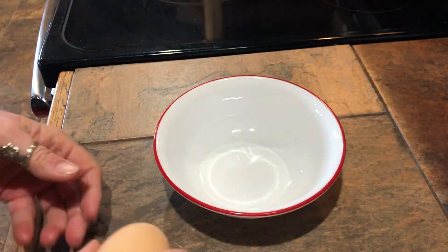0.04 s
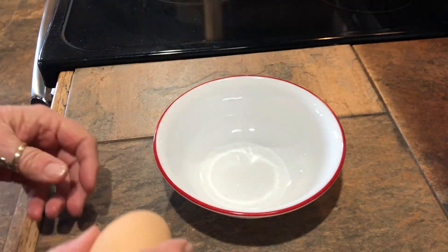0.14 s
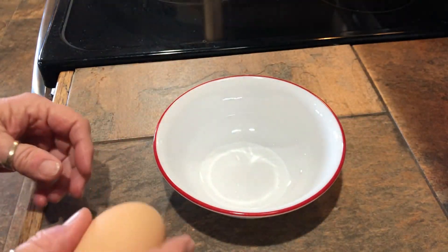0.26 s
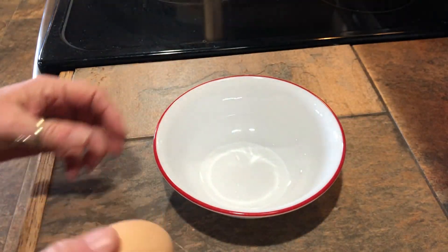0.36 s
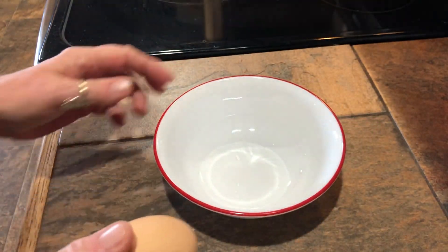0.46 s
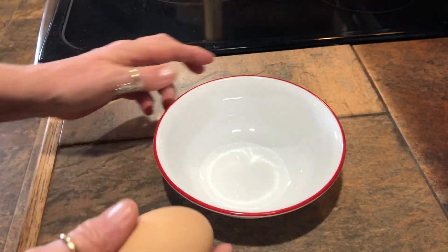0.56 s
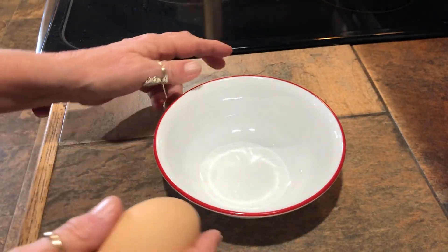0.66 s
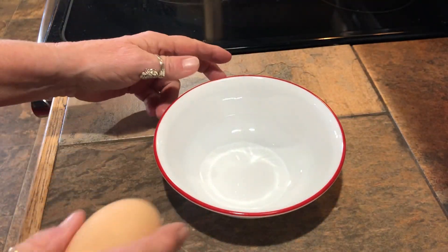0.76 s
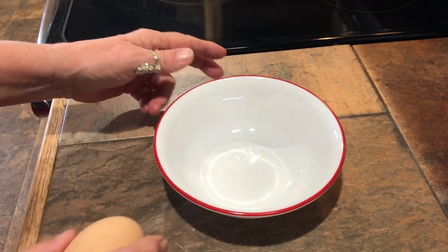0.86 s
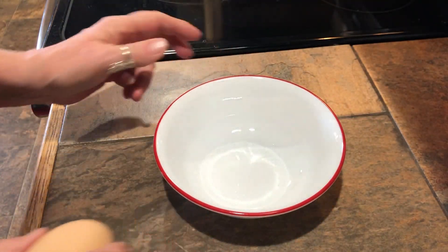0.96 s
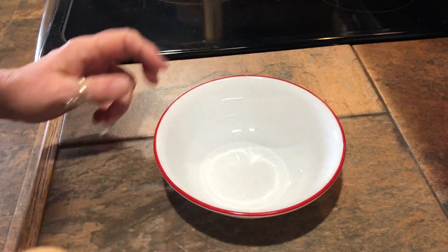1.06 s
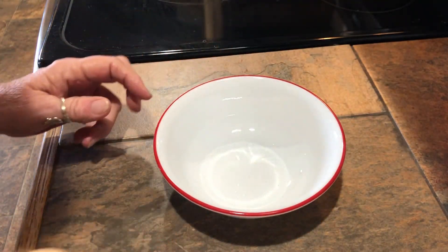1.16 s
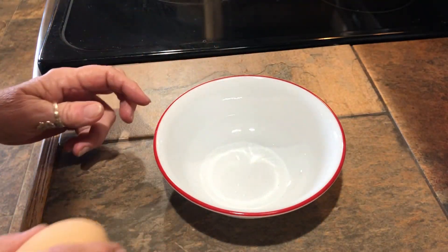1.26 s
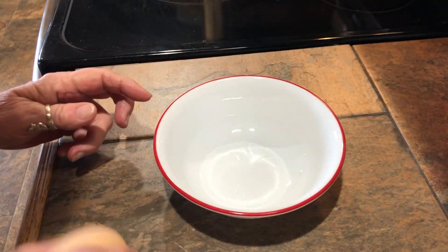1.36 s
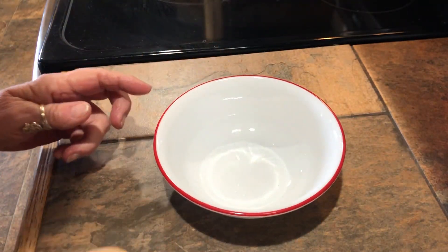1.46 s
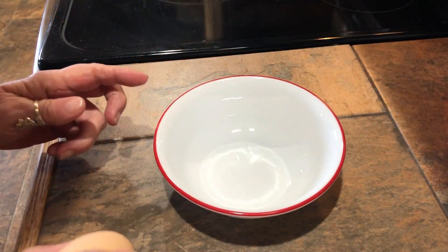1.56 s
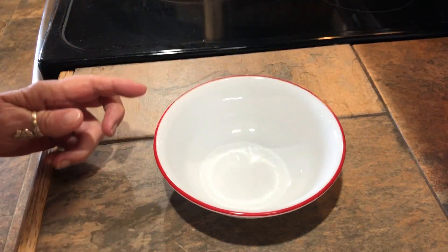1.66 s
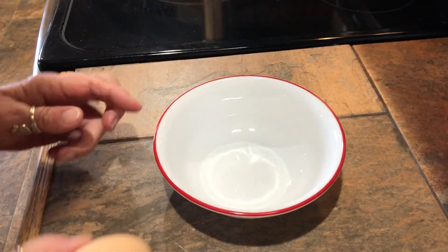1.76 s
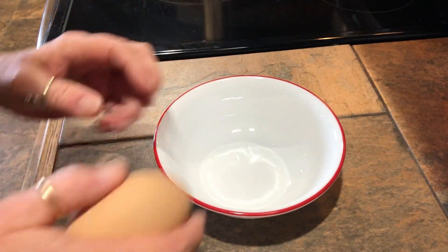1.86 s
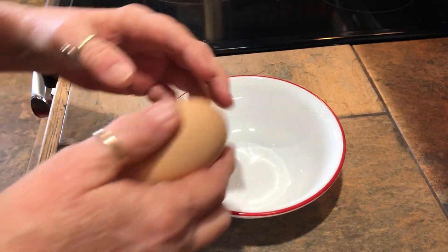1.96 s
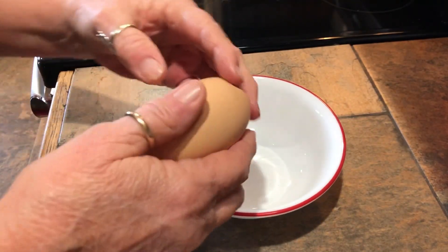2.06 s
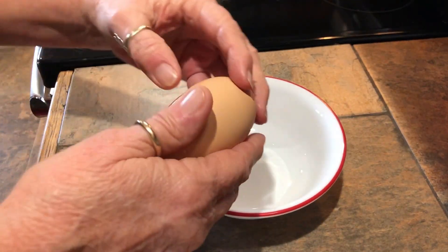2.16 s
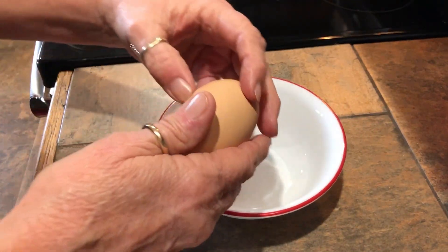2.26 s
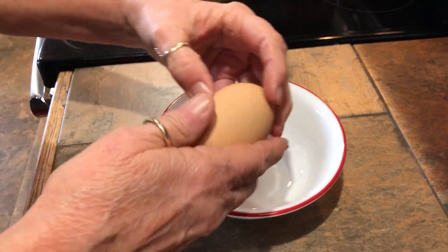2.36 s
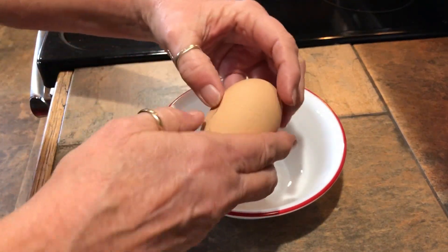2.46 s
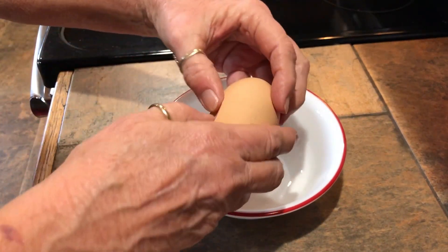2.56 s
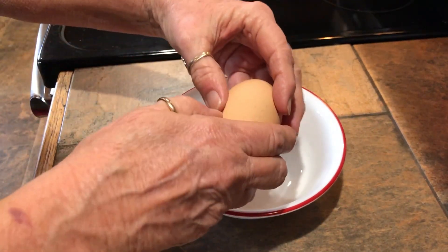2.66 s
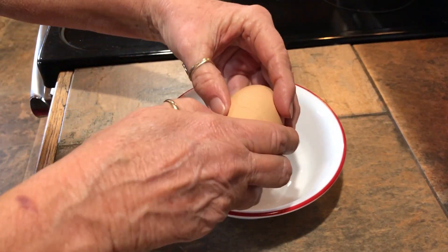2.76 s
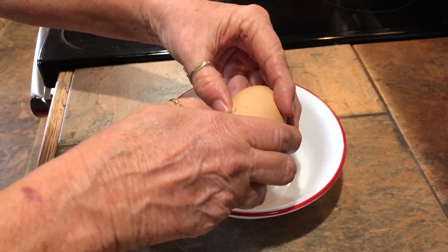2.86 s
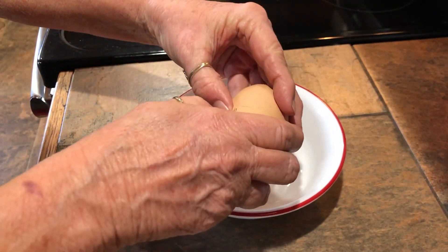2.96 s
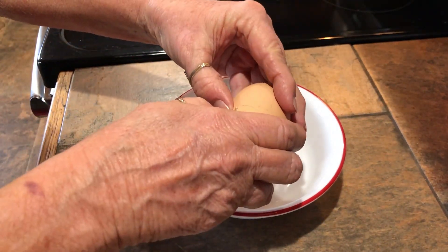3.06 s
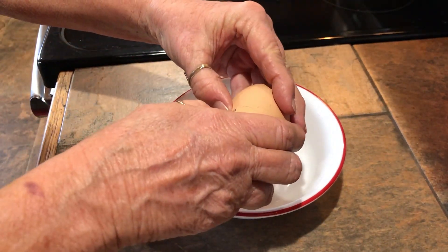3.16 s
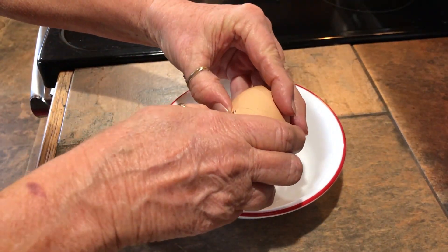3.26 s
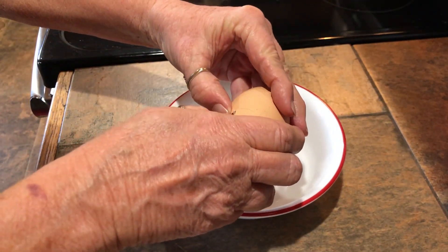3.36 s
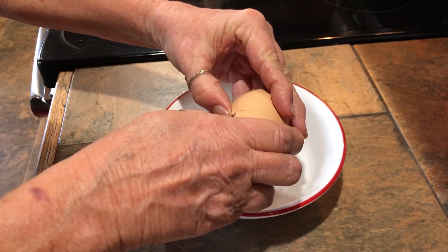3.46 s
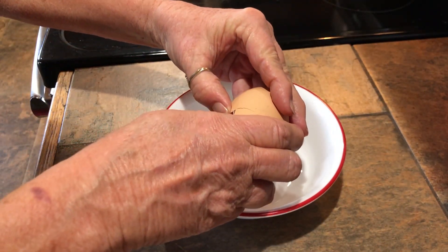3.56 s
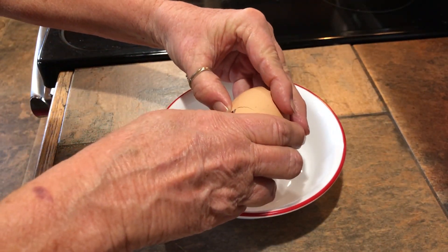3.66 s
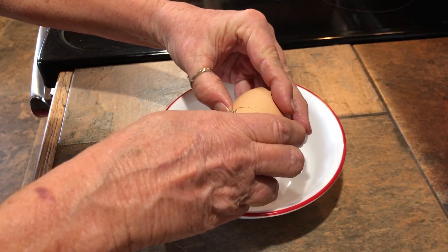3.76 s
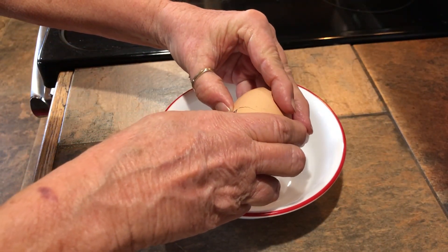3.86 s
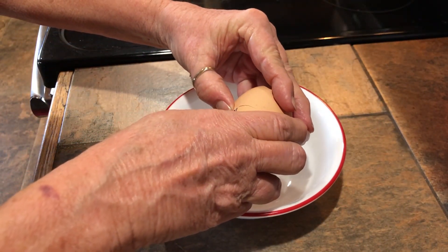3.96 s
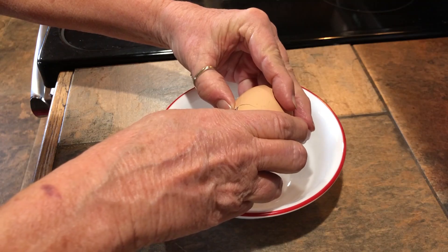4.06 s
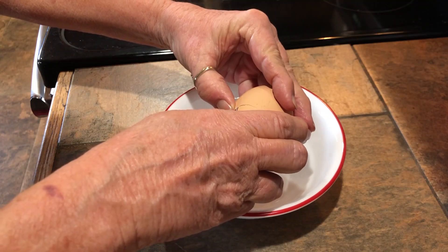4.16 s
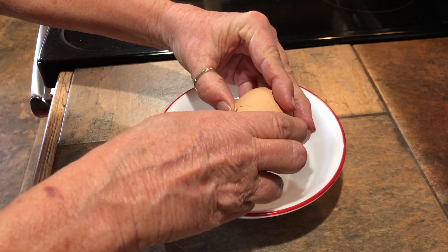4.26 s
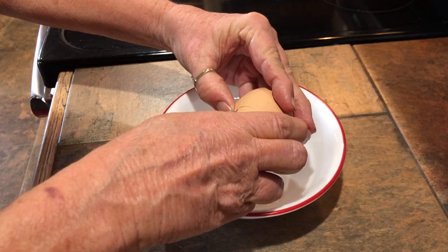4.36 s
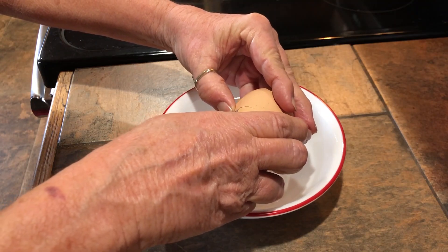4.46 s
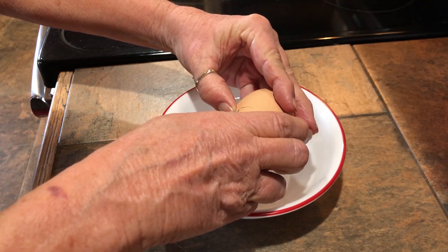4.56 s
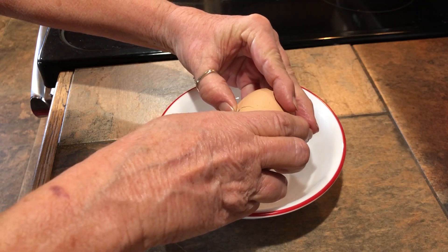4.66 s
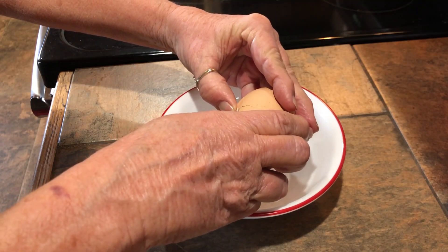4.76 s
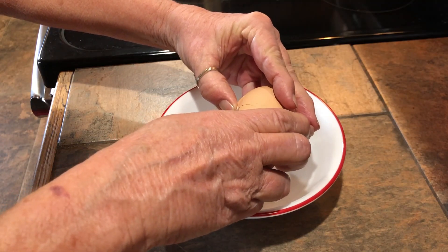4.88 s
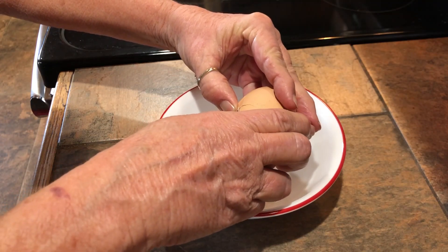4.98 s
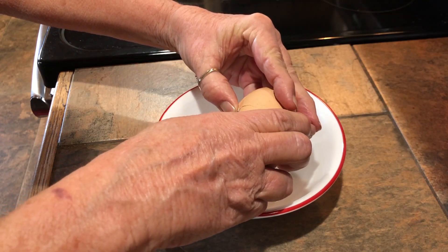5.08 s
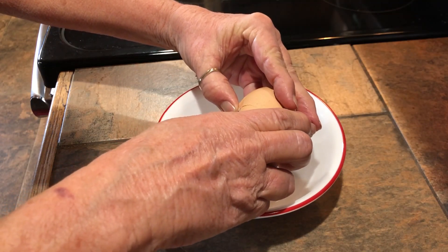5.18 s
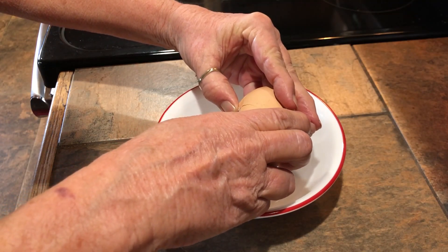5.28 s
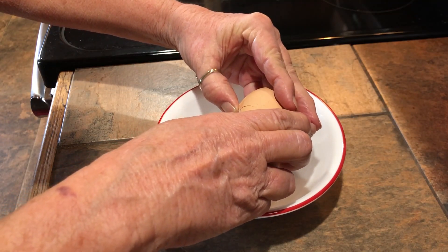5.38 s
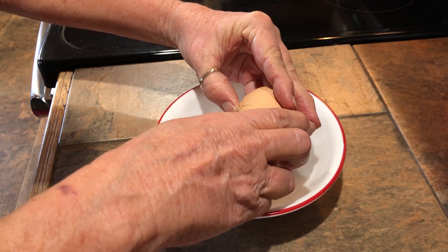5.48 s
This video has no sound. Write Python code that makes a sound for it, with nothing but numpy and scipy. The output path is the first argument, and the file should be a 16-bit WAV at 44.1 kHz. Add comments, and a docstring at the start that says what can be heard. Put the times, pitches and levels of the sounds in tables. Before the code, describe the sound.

In a quiet kitchen, heard from close by, an eggshell caves in against a hard counter with a loud double knock that rings briefly in the room. A short pause follows. Then the shell is slowly pulled open, ticking and crackling in small uneven clusters, with soft bumps and a faint rub of fingers. The brittle snaps grow stronger toward the end, over a very low room hum.

```python
"""An eggshell fractures: knocked twice on a tiled kitchen counter, then pried apart by thumbs over a bowl.
Each knock excites the modes of the counter and the cabinet below. Each crack is an impulse that rings
the shell and the opening hollow inside it, and runs of tiny fractures merge into crumbling. Skin rubs
softly on the shell, dull contacts sound near and far, and the kitchen hums and reverberates."""
import sys
import numpy as np
from scipy import signal
from scipy.fft import rfft, irfft, next_fast_len
from scipy.io import wavfile
from scipy.ndimage import uniform_filter1d

SR = 44100
rng = np.random.default_rng(int(sys.argv[2]) if len(sys.argv) > 2 else 0)


def to_wav(sig):
    """Store sig (one row per channel, or 1-D mono) as 16-bit WAV at the path in sys.argv[1].

    Samples outside -1..1 are clipped; the rate is SR.
    """
    pcm = np.clip(np.atleast_2d(sig), -1, 1) * 32767
    pcm = np.round(pcm).astype(np.int16)
    wavfile.write(sys.argv[1], SR, pcm.T)  # frames by channels


N = 243431


def amp(db):
    """Amplitude ratio of a level in decibels."""
    return 10 ** (np.asarray(db) / 20)


def unit(x):
    """Normalisation to an rms of 1."""
    return x / np.sqrt(np.mean(x ** 2, axis=-1, keepdims=True) + 1e-20)


def along(points, hz):
    """Interpolation of (frequency, value) points on a logarithmic frequency axis."""
    f, v = np.transpose(points)
    return np.interp(np.log(hz + 1), np.log(f + 1), v)


def filtered(x, response):
    """Linear filtering: the spectrum is multiplied by a frequency response."""
    n = x.shape[-1]
    m = next_fast_len(n + 8192)
    return irfft(rfft(x, m) * response(np.fft.rfftfreq(m, 1 / SR)), m)[..., :n]


def noise(shape, response):
    """Spectral shaping of white noise, at an rms of 1."""
    return unit(filtered(rng.standard_normal(shape), response))


def flicker(n, spread_db, samples):
    """Random amplitude modulation: a log-normal gain, smoothed over a span of samples."""
    return amp(spread_db * unit(uniform_filter1d(rng.standard_normal(n), size=samples)))


def resonance(hz, centre_hz, width_hz):
    """Band-pass response of a damped harmonic oscillator."""
    return 1j * hz * width_hz / (centre_hz ** 2 - hz ** 2 + 1j * hz * width_hz + 1e-9)


def modes(table):
    """Modal superposition: a body's resonances add, here with alternating signs."""
    return lambda hz: sum((-1) ** k * amp(db) * resonance(hz, centre, width)
                          for k, (centre, width, db) in enumerate(table))


def fade(t, rise, t60):
    """Exponential decay, 60 dB in t60 seconds, after a smooth rise."""
    return (1 - np.exp(-t / rise)) * amp(-60 * t / t60)


def spells(rows, rise, t60, rest_db=-120):
    """Power summation of (start, end, level) spells that rise, hold and decay, over a resting level."""
    t = np.arange(N) / SR
    power = 0
    for start, end, db in rows:
        onset = np.clip((t - start) / rise + .5, 0, 1)
        power += (onset * amp(db - 60 * np.clip(t - end, 0, None) / t60)) ** 2
    return np.sqrt(power + amp(rest_db) ** 2)


def add(track, start, sound):
    """Superposition of a sound on a track, from a start time in seconds."""
    i = round(start * SR)
    track[i:i + len(sound)] += sound[:len(track) - i]


# Spectrum of the quiet kitchen: (frequency [Hz], relative density [dB])
HUM_SPECTRUM = [(15, -49), (25, -6), (135, -4), (296, -6), (524, -10.5), (809, -13), (979, -15.5),
                (1150, -16.5), (2090, -18), (3150, -20), (12900, -27.5), (15200, -28.5), (16500, -46.5)]
# Swells of the low rumble: (start [s], end [s], level [dB])
RUMBLE_SWELLS = [(0, .05, -69.5), (.38, .52, -66), (2.9, 3.1, -69), (3.55, 3.8, -70)]

def hum():
    """Ambient noise: a steady broadband floor and a low rumble that swells now and then."""
    colour = lambda hz: amp(along(HUM_SPECTRUM, hz))
    steady = amp(-70.5) * noise(N, colour)
    rumble = noise(N, lambda hz: colour(hz) * resonance(hz, 92, 620))
    return steady + spells(RUMBLE_SWELLS, rise=0.081, t60=1.5, rest_db=-72.5) * rumble


# Spectrum of skin sliding on shell: (frequency [Hz], relative density [dB])
SKIN_SPECTRUM = [(1500, -45.5), (2500, -5), (3600, -3), (5400, 1.5), (8000, 0.5), (12000, -1), (15500, 1.5),
                 (16500, -23.5)]
# Finger strokes: (start [s], end [s], level [dB])
FINGER_STROKES = [(0, .12, -72), (.55, .66, -68.5), (.87, .9, -82), (1.0, 1.03, -75.5), (1.07, 1.12, -76),
                  (1.96, 2.08, -68), (2.12, 2.36, -74), (2.42, 2.49, -64), (2.54, 2.72, -71),
                  (3.5, 3.62, -76), (4.045, 4.07, -66), (4.8, 5.2, -69.5)]
# Resonances of a singing scrape: (frequency [Hz], bandwidth [Hz], gain [dB])
SCRAPE_MODES = [(3600, 220, -2.5), (5400, 200, -1)]
# Faint scrapes: (start [s], end [s], level [dB])
SCRAPE_SPELLS = [(.54, .645, -71), (2.67, 2.725, -73)]
# Narrow-band murmurs: (start [s], end [s], level [dB], centre frequency [Hz])
MURMUR_SPELLS = [(1.373, 1.482, -74, 1940), (4.272, 4.558, -71, 1650), (4.61, 4.884, -73, 1500),
                 (4.9, 5.11, -65, 1400)]

def rubbing():
    """Sliding friction: skin on shell gives grainy noise and resonant scrapes; a murmur comes and goes."""
    grain = flicker(N, spread_db=1.0, samples=90)
    stutter = flicker(N, spread_db=1.5, samples=1800)  # fingers stop and start
    skin = unit(stutter * grain * noise(N, lambda hz: amp(along(SKIN_SPECTRUM, hz))))
    murmur = np.zeros(N)
    for *spell, centre_hz in MURMUR_SPELLS:
        band = noise(N, lambda hz: resonance(hz, centre_hz, width_hz=600) ** 2)
        murmur += spells([spell], rise=0.06, t60=0.5) * stutter * band
    scrape = unit(grain * noise(N, modes(SCRAPE_MODES)))
    strokes = spells(FINGER_STROKES, rise=0.037, t60=0.21, rest_db=-81.5)  # the grip never falls silent
    return strokes * skin + spells(SCRAPE_SPELLS, rise=.015, t60=.04) * scrape + murmur


# Modes of the held shell: (frequency [Hz], bandwidth [Hz], gain [dB])
SHELL_MODES = [(5140, 520, 1.5), (5980, 460, -3.5), (6400, 530, -2)]
# The hollow rings longer once the gap opens; two rows: (time [s]), (bandwidth [Hz])
HOLLOW_OPENING = [4.3, 4.45], [240, 125]
# Distinct cracks: (time [s], relative level [dB], dull gain [dB], bright gain [dB], hollow gain [dB],
# hollow frequency [Hz])
SHELL_CRACKS = [(0.2946, -61.5, -9, 19.5, -9, 750), (0.4774, -61.5, 19, -14, -20, 810),
                (2.0029, -50.5, 2, 4, -6, 1697), (2.5224, -64, 8, -13, 4.5, 764),
                (2.7611, -50.5, -8, -6, -17.5, 846), (2.7848, -52.5, -11, 11, -7, 1350),
                (2.7916, -35, -2.5, 5, -18, 1450), (2.8058, -36.5, -22, 8, -35, 1306),
                (2.824, -39, -13, 1, -33, 842), (2.839, -48, -11, -8, -5.5, 1720),
                (2.8775, -44.5, -2, -11, -17.5, 1340), (2.9773, -24, -12, -7, -43, 1550),
                (2.9915, -28, -32, -16.5, -44, 1497), (3.0167, -32.5, -12, 1, -24, 1650),
                (3.0279, -25.5, -1.5, 1, -35, 1700), (3.057, -45, -4, -10, -17, 751),
                (3.1143, -33, -2, 0, -25, 1360), (3.2262, -51, 3, 12, -18, 1345),
                (3.2844, -56, -10, 13, -22, 816), (3.2942, -41.5, -20, -3, -38, 1754),
                (3.335, -43, -1, -11.5, -29, 1780), (3.3504, -39, -6, 1, -34, 1730),
                (3.3625, -45, -5, 4, -14, 1360), (3.3957, -53, -2, -5, -17, 1350),
                (3.414, -53, 8, -1, -15, 799), (3.496, -53.5, -6, 1.5, -21, 942),
                (3.5586, -43, -3, 5, -34, 920), (3.5704, -55, -12, 15, -14, 793),
                (3.5825, -38, -14, -6, -30, 996), (3.5992, -38.5, -4, 3, -35, 870),
                (3.6306, -47, -7, -13, -16, 890), (3.6568, -27, -5.5, -2.5, -30, 1720),
                (3.7481, -41.5, -13, -18, -18, 1400), (3.8307, -53, -3.5, 0, -27, 834),
                (3.863, -51.5, 1, -4, -24, 783), (3.8911, -51, 7.5, 9.5, -7, 1700),
                (3.9199, -52.5, -3, -22, -17, 886), (3.9637, -27.5, -8, -1.5, -32, 880),
                (4.0251, -41, -0.5, -8, -41, 758), (4.0672, -45.5, -2, 4, -9, 1570),
                (4.107, -50.5, -8.5, -5, -10, 1730), (4.163, -49, -18, 2, -25, 885),
                (4.1929, -41, -2, -26, -28, 1488), (4.3648, -37.5, 0, -23, -11.5, 1443),
                (4.4585, -47.5, -2, 4.5, -8, 840), (4.473, -50, -1, -9, -5, 1640),
                (4.5234, -54.5, -8, -3, -20, 1600), (4.575, -51, -14, -6, -5, 1350),
                (4.586, -35.5, 0, -1, -19, 880), (4.621, -46.5, 0, 1, 3.5, 906),
                (4.6506, -56.5, 18, -13, 5, 1320), (4.6743, -48.5, -18, 15.5, -10, 1290),
                (4.7246, -36.5, -24, -16, -3, 1710), (4.7326, -13.5, -13.5, -8, -23.5, 1055),
                (4.777, -58.5, 8, 8, 9.5, 1350), (4.8129, -24.5, -0.5, 0, -16.5, 1380),
                (4.8399, -39, 8, 17, -6.5, 1710), (4.8476, -36.5, -2, -2, -16, 1580),
                (4.8631, -44.5, 8.5, -20, -2, 1280), (4.9023, -21.5, -7, 11, -14.5, 1470),
                (4.915, -21.5, -17, -5, -25, 870), (4.9543, -7.5, -10, -0.5, -21.5, 1353),
                (5.0292, -41.5, 5.5, 4, -4.5, 1350), (5.0647, -34, -21, 2.5, -12.5, 1390),
                (5.0903, -39.5, -7, 5, -37, 1467), (5.1009, -31.5, -3, 2.5, -11, 1520),
                (5.1999, -43.5, -2, 9.5, -10, 1510), (5.2362, -16.5, -29, -1.5, -38, 1530),
                (5.2774, -44, 1, -6, -10, 1028), (5.303, -33.5, -5, 8, -18, 1650),
                (5.446, -23.5, -20.5, 3.5, -20.5, 1680), (5.475, -36.5, -10, -3, -21, 1630),
                (5.4845, -45.5, -12, 14, -2.5, 1000), (5.4973, -27.5, -10, 8, -25, 1600),
                (5.5052, -37, -13, -5, -12, 1000)]

def cracks():
    """Brittle fracture: a tick and a noise burst excite the egg's cavity. Returns (all, ticks alone)."""
    out, ticks, t = np.zeros(N), np.zeros(N), np.arange(SR // 16) / SR
    detune = np.exp(.045 * rng.standard_normal((len(SHELL_CRACKS), 1)))  # each crack shifts the modes
    bands = [lambda hz: modes(SHELL_MODES)(hz / detune),
             lambda hz: resonance(hz, 3200, 3530) ** 2,  # dull
             lambda hz: resonance(hz, 8100, 9600) ** 2 * resonance(hz, 12000, 20000),  # bright
             lambda hz: resonance(hz, 1430, 2430) ** 2]  # broad puff of air from the hollow
    hiss = np.array([noise((len(SHELL_CRACKS), len(t)), band) for band in bands])
    impulses = np.ones(detune.shape) * (t == t[8])
    tick = np.array([filtered(impulses, band) for band in bands])
    tick /= np.abs(tick).max(axis=2, keepdims=True)
    flutter = amp(-13.5) * fade(t, 0.00034, 0.084) / (1 + (t / 0.014) ** 4)  # off hands and bowl
    snap = fade(t, 0.00045, 0.0086) + flutter
    for k, (start, db, dull_db, bright_db, hollow_db, hollow_hz) in enumerate(SHELL_CRACKS):
        mix = amp([db, db + dull_db, db + bright_db, db + hollow_db + 7])
        burst = amp(-8.5) * snap * (mix @ hiss[:, k])
        width_hz = np.interp(start, *HOLLOW_OPENING)
        air = filtered(snap * hiss[-1, k], lambda hz: resonance(hz, hollow_hz, width_hz))
        add(out, start, burst + amp(db + hollow_db) * air / np.abs(air).max())
        add(ticks, start, mix @ tick[:, k])
    return out + amp(-3.5) * ticks, ticks


# Decay of the kitchen: (frequency [Hz], reverberation time T60 [s])
KITCHEN_T60 = [(100, .4), (600, 0.13), (1500, 0.59), (4000, 0.42), (9000, 0.34), (15000, 0.11)]

def reverberation(x):
    """Diffuse reflection: hands and egg keep moving, so each stretch meets its own decaying noise tail."""
    out, step, delay_s = np.zeros(N), SR // 5, 0.0082
    for i in range(0, N, step):
        hz, t, spectra = signal.stft(rng.standard_normal(SR // 2), SR, nperseg=256)
        decay = amp(-60 * t / along(KITCHEN_T60, hz)[:, None])
        tail = signal.istft(spectra * decay, SR, nperseg=256)[1]
        add(out, i / SR + delay_s, signal.fftconvolve(x[i:i + step], tail / np.linalg.norm(tail)))
    return out


# Soft contacts: (time [s], level [dB], centre frequency [Hz], T60 [s], room excitation [dB])
SOFT_BUMPS = [(0.3147, -41, 1000, 0.068, -64), (0.441, -48.5, 854, 0.046, -73.5),
              (0.48, -52.5, 302, 0.052, -74.5), (1.179, -62.5, 1120, 0.053, -84),
              (1.363, -70, 4595, 0.04, -99), (2.792, -49.5, 410, 0.042, -78),
              (2.978, -57, 600, 0.016, -80.5), (3.029, -55, 590, 0.032, -80), (3.113, -51, 500, 0.029, -99),
              (3.518, -58, 776, 0.21, -91), (3.528, -53, 300, 0.14, -94), (3.57, -43.5, 590, 0.069, -94),
              (3.597, -53.5, 503, 0.092, -94), (3.66, -46.5, 500, 0.019, -100),
              (4.036, -53.5, 840, 0.084, -73), (4.04, -51, 2230, 0.061, -75), (4.061, -57, 2740, 0.08, -82),
              (4.2366, -42.5, 1510, 0.03, -98), (4.242, -41.5, 250, 0.019, -82),
              (4.7307, -42.5, 590, 0.028, -70)]

def bumps():
    """Damped impacts: dull puffs, the distant ones mostly reverberant. Returns (direct, room drive)."""
    direct, drive, t = np.zeros(N), np.zeros(N), np.arange(SR // 5) / SR
    impulse = 1. * (t == 0)
    for start, db, centre_hz, t60, room_db in SOFT_BUMPS:
        puff = noise(len(t), lambda hz: resonance(hz, centre_hz, 0.64 * centre_hz) ** 2)
        add(direct, start, amp(db) * fade(t, 0.00031, t60) * puff)
        colour = lambda hz: resonance(hz, 0.73 * centre_hz, 1.7 * centre_hz) * resonance(hz, 1500, 6000)
        add(drive, start, amp(room_db) * unit(filtered(impulse, colour)))
    return direct, drive


# Spectrum of the shell caving in: (frequency [Hz], relative density [dB])
SMASH_SPECTRUM = [(88, -44.5), (150, -17), (1180, -10.5), (1900, -13), (2980, -5.5), (3700, -9.5),
                  (4160, -5), (7080, -8.5), (7660, -11), (11000, -9.5), (15300, -17.5), (16500, -37)]
# Modes of the tiled counter: (frequency [Hz], bandwidth [Hz], gain [dB])
COUNTER_MODES = [(340, 120, -12), (503, 30, -2), (788, 85, -1.5), (1000, 52, -2), (1210, 40, 0.5),
                 (1350, 54, -3.5), (1600, 92, -4), (1906, 100, -15)]
# Modes of the cabinet below: (frequency [Hz], bandwidth [Hz], gain [dB])
CABINET_MODES = [(65, 90, -11.5), (116, 32, 0), (138, 40, -4), (213, 25, -8)]
# Blows on the counter: (time [s], level [dB], counter gain [dB], cabinet gain [dB], burst rise [s],
# burst T60 [s], splinter gain [dB], pop gain [dB], pop frequency [Hz])
EGG_KNOCKS = [(1.4823, -2, -12, -21.5, .0006, .03, -29, -5, 1213),
              (1.7026, -3, -17.5, -26, 0.0024, 0.029, -23.5, -14.5, 337)]

def knocks():
    """Impact excitation: the shell caves in, counter and cabinet ring. Returns (direct, room drive)."""
    direct, impulses, t = np.zeros(N), np.zeros(N), np.arange(SR // 2) / SR
    colour = lambda hz: amp(along(SMASH_SPECTRUM, hz))
    for start, db, ring_db, thump_db, rise, t60, splinter_db, pop_db, pop_hz in EGG_KNOCKS:
        grit = flicker(len(t), spread_db=3.3, samples=20)  # many fractures in a row
        envelope = fade(t, rise, t60) + amp(splinter_db) * fade(t, 0.0015, 0.041)
        burst = unit(grit * noise(len(t), colour)) * envelope
        pop = fade(t, 0.0022, 0.036) * np.sin(2 * np.pi * pop_hz * t)
        ring_decay = fade(t, 0.0016, 0.054) + amp(-20.5) * fade(t, 0.0026, 0.45)
        ring = noise(len(t), modes(COUNTER_MODES)) * ring_decay
        push = np.sin(np.pi * np.clip((t - .005) / 0.0027, 0, 1))  # the egg's liquid lands just after
        thump = filtered(push, modes(CABINET_MODES))
        rumble = amp(-13) * fade(t, .015, .45) * noise(len(t), modes(CABINET_MODES))
        cabinet = thump / np.abs(thump).max() + rumble
        knock = amp(-4.5) * burst + amp(pop_db) * pop + amp(ring_db) * ring + amp(thump_db) * cabinet
        add(direct, start, amp(db) * knock)
        impulses[round((start + .003) * SR)] = amp(db)
    return direct, filtered(impulses, colour)


# Runs of tiny fractures: (start [s], end [s], relative level [dB])
CRUMBLE_RUNS = [(2.832, 2.895, -50.5), (2.924, 2.956, -62), (2.975, 3.005, -41.5), (2.998, 3.074, -47.5),
                (3.198, 3.34, -60), (3.329, 3.398, -58), (3.558, 3.656, -58.5), (3.73, 3.76, -54.5),
                (3.778, 3.818, -67.5), (4.3, 4.325, -66), (4.42, 4.437, -62.5), (4.55, 4.57, -66),
                (4.605, 4.645, -53), (4.833, 4.89, -58), (5.453, 5.463, -31), (5.461, 5.521, -41.5)]

def crumbling(fractures_per_s=1200, spread_db=2.6):
    """Shot noise: tiny fractures of uneven strength occur at random, coloured by the shell's modes."""
    t = np.arange(N) / SR
    runs = sum(amp(db) * np.clip(np.minimum(t - start, end - t) / 0.012, 0, 1)
               for start, end, db in CRUMBLE_RUNS)
    breaks = rng.random(N) < fractures_per_s / SR
    specks = breaks * amp(spread_db * rng.exponential(size=N)) * rng.standard_normal(N)
    smear = fade(t[:SR // 40], 0.00044, 0.01) * rng.standard_normal(SR // 40)
    crackle = signal.fftconvolve(runs * unit(specks), smear / np.linalg.norm(smear))[:N]
    colour = lambda hz: (amp(-6.5) * modes(SHELL_MODES)(hz) + amp(-3.5) * resonance(hz, 6240, 8100)
                         + amp(-19) * resonance(hz, 2300, 2000))
    return filtered(crackle, colour)


def scene():
    """Superposition of direct and reverberant sound at one point."""
    blows, blow_drive = knocks()
    snaps, ticks = cracks()
    contacts, contact_drive = bumps()
    crumbs = crumbling()
    room = reverberation(amp(2.0) * blow_drive + amp(-21.5) * ticks + amp(-19) * crumbs + contact_drive)
    return (blows + snaps + crumbs + contacts + room + rubbing() + hum())[None]


def record(dry):
    """Soft saturation rounds the loudest peaks; band limiting removes deep bass and the highest treble."""
    rounded = dry / (1 + np.abs(dry / .92) ** 4) ** .25
    bass_cut = lambda hz: (hz ** 2 / (hz ** 2 - 45 ** 2 - 1.4j * 45 * hz)) ** 2
    treble_cut = lambda hz: amp(np.interp(hz, [15700, 16000, 16700, 17050], [0, -18, -22, -90]))
    return filtered(rounded, lambda hz: bass_cut(hz) * treble_cut(hz))


dry = scene()
out = record(dry)
to_wav(out)
```